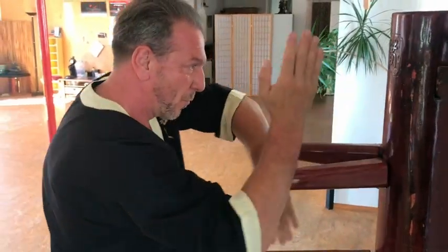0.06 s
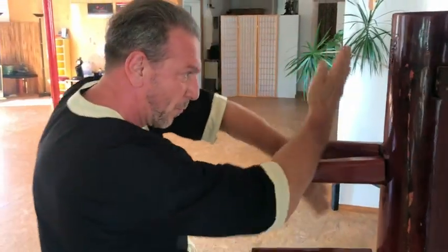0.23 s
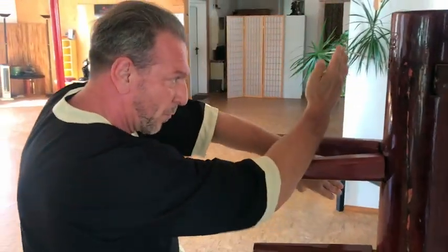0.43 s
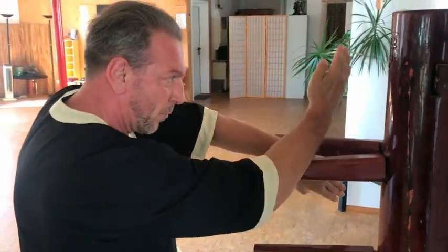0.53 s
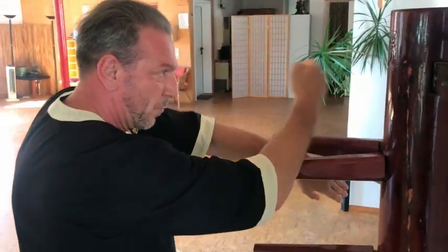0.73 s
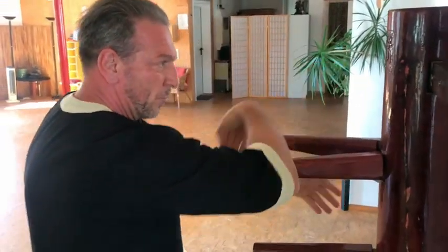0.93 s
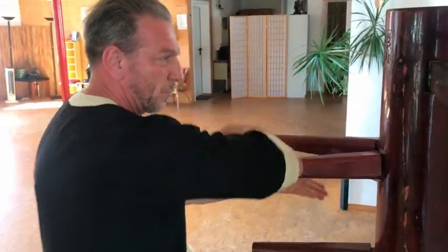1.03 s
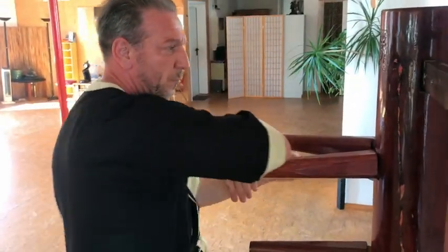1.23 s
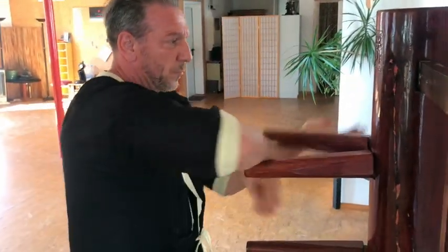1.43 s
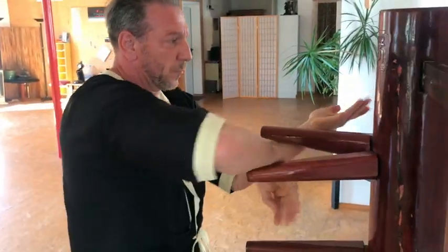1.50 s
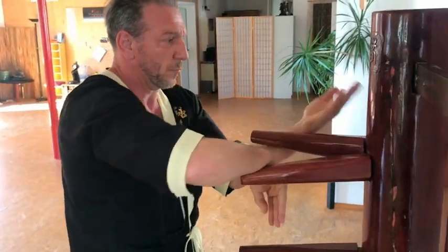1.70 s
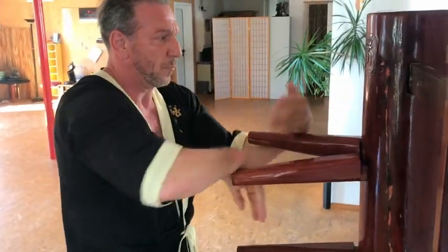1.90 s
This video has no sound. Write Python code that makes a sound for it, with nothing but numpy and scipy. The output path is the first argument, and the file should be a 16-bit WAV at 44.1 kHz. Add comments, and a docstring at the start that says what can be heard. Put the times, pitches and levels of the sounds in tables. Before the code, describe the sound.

Arms knock twice against a wooden training dummy, its loose pegs clattering in an echoing hall.

```python
"""Two forearm strikes on a wooden training dummy, heard from close by in a large hall.
A low rumble and a faint hiss come first. Near 0.25 s a sleeve brushes a loose peg and the arm thuds
on it; the peg slams into its slot and rattles, exciting the modes of the trunk, while the frame shudders
and the hiss fades. At 1.5 s the second strike lands, with sleeves snapping taut and rubbing.
A few weaker knocks follow as the hall reverberates."""
import sys
import numpy as np
from scipy import signal
from scipy.fft import rfft, irfft
from scipy.io import wavfile
from scipy.ndimage import uniform_filter1d

SR = 44100
rng = np.random.default_rng(int(sys.argv[2]) if len(sys.argv) > 2 else 0)


def unload_audio(sound):
    """Save the sound as a 16-bit wav file, at the path given as the first command line argument."""
    columns = np.transpose(np.atleast_2d(sound))
    # keep every value between -1 and 1, then stretch to whole-number steps
    steps = np.round(np.clip(columns, -1, 1) * 32767)
    wavfile.write(sys.argv[1], SR, steps.astype(np.int16))


N = 85995
SCENE_T, EVENT_T = np.arange(N) / SR, np.arange(SR // 2) / SR
NEAR_CORRELATION = 0.56  # between the channels, for nearby noise sources


def amp(db):
    """Amplitude ratio of a level in decibels."""
    return 10 ** (np.asarray(db) / 20)

def unit(x):
    """Normalisation to rms 1."""
    return x / np.sqrt(np.mean(x ** 2) + 1e-20)

def read(points, hz):
    """Interpolation on a logarithmic frequency axis."""
    f, value = np.transpose(points)
    return np.interp(np.log(hz + 1), np.log(f), value)

def add(mix, start_s, sound):
    """Superposition: a sound joins both channels at start_s."""
    part = mix[:, max(round(start_s * SR), 0):][:, :sound.shape[-1]]
    part += sound[..., :part.shape[1]]

def decay(t, t60):
    """Exponential damping: 60 dB down after t60 seconds."""
    return np.exp(-np.log(1000) * t / t60)

def lowpass(x, corner_hz):
    """Second-order low-pass: a softer contact excites less treble."""
    return signal.lfilter(*signal.butter(2, corner_hz, fs=SR), x)

def pair(a, b, correlation):
    """Partial coherence: two independent signals mix into two correlated channels."""
    return np.array([a, correlation * a + np.sqrt(1 - correlation ** 2) * b])

def noise(spectrum):
    """Spectral shaping of white noise, at rms 1."""
    gain = amp(read(spectrum, np.fft.rfftfreq(N, 1 / SR)))
    return unit(irfft(rfft(rng.standard_normal(N)) * gain, N))

def colour(x, spectrum, size=2048):
    """Minimum-phase filtering: the spectrum is shaped and nothing precedes the onset."""
    log_gain = np.log(amp(read(spectrum, abs(np.fft.fftfreq(size, 1 / SR)))))
    taps = np.fft.ifft(np.exp(np.conj(signal.hilbert(log_gain)))).real
    return signal.fftconvolve(x, taps)[:len(x)]

def burst(spectrum, t60):
    """Modal overlap: countless short-lived modes merge into decaying noise."""
    envelope = decay(EVENT_T, t60)
    a, b = (unit(colour(rng.choice([-1., 1.], len(EVENT_T)) * envelope, spectrum)) for _ in range(2))
    return pair(a, b, NEAR_CORRELATION) * np.sqrt(np.mean(envelope ** 2))

def ring(modes, stretch=1, longest_t60_s=0.26):
    """Free vibration: wood rings briefly as a sum of damped modes, decay times capped."""
    waves = 0
    for k, (hz, db, t60) in enumerate(modes):
        envelope = amp(db) * decay(EVENT_T, min(t60, longest_t60_s))
        waves += (-1) ** k * envelope * np.sin(2 * np.pi * hz * stretch * EVENT_T)
    return waves / np.sqrt(sum(amp(db) ** 2 for _, db, _ in modes))


# Spectrum of the hall's rumble: frequency_hz, relative_db
RUMBLE_SPECTRUM = [(20, -6.5), (45, -2.5), (90, -9), (180, -17.5), (500, -22), (1500, -24.5), (4500, -34.5),
                   (9000, -38), (16000, -46.5)]

def rumble(level_db=-59.5):
    """Ambient noise of the hall: mostly bass, and nearly incoherent between the channels."""
    return amp(level_db) * pair(noise(RUMBLE_SPECTRUM), noise(RUMBLE_SPECTRUM), correlation=0.15)

def hiss(half_width_hz=200, end_s=0.58, fade_s=0.05):
    """Narrow-band noise: modulation shifts low-passed noise up to two faint bands, which fade out."""
    bands = np.zeros((2, N))
    for centre_hz, db in (3252, -70), (4400, -68.5):
        flutter = unit(lowpass(rng.standard_normal((2, N)), half_width_hz))
        bands += amp(db) * flutter * np.sin(2 * np.pi * centre_hz * SCENE_T)
    return bands * np.clip((end_s - SCENE_T) / fade_s, 0, 1)


# Shudders of the floor and stand: start_s, level_db, pitch_hz, t60_s
FRAME_SHUDDERS = [(0.06, -45, 44.4, 0.51), (0.248, -36, 275, .13), (.295, -35.5, 160.6, 0.19),
                  (0.314, -47, 103.7, .6), (0.319, -45.5, 73, 0.64), (1.538, -38.5, 220.5, 0.15),
                  (1.547, -52, 80.7, 0.89), (1.743, -47, 233, 0.058), (1.899, -48.5, 137, 0.43)]

def frame_shudder(rise_s=0.00612):
    """Damped resonance: low modes of the floor and stand swell quickly and die away."""
    out = np.zeros((2, N))
    for start_s, db, hz, t60 in FRAME_SHUDDERS:
        envelope = (1 - np.exp(-EVENT_T / rise_s)) * decay(EVENT_T, t60)
        add(out, start_s, amp(db) * envelope * np.sin(2 * np.pi * hz * EVENT_T))
    return out


# Modes of a peg: pitch_hz, relative_db, t60_s
PEG_MODES = [(373, -16, 0.031), (517, -14, .06), (637, -11.5, 0.065), (778.8, -6, 0.15),
             (819.6, -1.5, 0.049), (1511, -11, 0.027), (1631.4, -7.5, 0.12), (2440, -8.5, 0.021),
             (2620, -9, .05)]
# Spectrum of clattering wood: frequency_hz, relative_db
CLATTER_SPECTRUM = [(50, -50), (130, -26.5), (230, -10.5), (450, -4.5), (800, 1.5), (1400, -4.5),
                    (2300, -8.5), (3600, -8.5), (5000, -11.5), (7000, -5), (16000, -42.5)]
# Sleeve or forearm meets peg: start_s, ring_db, noise_db, pitch_hz, corner_hz
SOFT_CONTACTS = [(.1735, -44.5, -45.5, 693, 780), (0.237, -42.5, -30.5, 900, 4200),
                 (.2411, -13.5, -20.5, 783.5, 1093), (.2527, -20, -12, 671.3, 1126),
                 (1.5048, -17.5, -27, 833, 2600), (1.5238, -15, -22.5, 832, 2320)]

def soft_contacts(strongest_mode_hz=820):
    """Cushioned impact: a sleeve brushes the peg, then the forearm thuds on it."""
    blows, rings = np.zeros((2, 2, N))
    for start_s, ring_db, noise_db, pitch_hz, corner_hz in SOFT_CONTACTS:
        peg = ring(PEG_MODES, stretch=pitch_hz / strongest_mode_hz)
        contact = burst(CLATTER_SPECTRUM, t60=0.059)
        add(rings, start_s, amp(ring_db) * lowpass(peg, corner_hz))
        add(blows, start_s, amp(noise_db) * lowpass(contact, corner_hz))
    return blows, rings


# Spectrum of sleeve cloth: frequency_hz, relative_db
CLOTH_SPECTRUM = [(300, -22), (2000, -11.5), (5000, -7.5), (7500, -4.5), (10500, 2), (12500, -1.5),
                  (14800, -12), (16200, -17.5)]
# Envelope of a sleeve sliding over a peg: time_s, level_db
SLEEVE_RUSTLE = [(0, -92), (.231, -73), (0.235, -43), (.25, -53.5), (.3, -69.5), (.5, -96), (1.101, -89),
                 (1.4, -70.5), (1.52, -71.5), (1.62, -49), (1.645, -42), (1.71, -50.5), (1.76, -48.5),
                 (1.787, -49.5), (1.83, -47), (1.87, -50.5), (1.95, -63)]
# Cloth snaps taut: start_s, level_db
SLEEVE_SNAPS = [(1.123, -64.5), (1.262, -59.5), (1.5429, -17), (1.6295, -23.5), (1.633, -23), (1.6475, -35),
                (1.7673, -34), (1.7704, -21), (1.7855, -31)]

def sleeves(grain_db=2.5):
    """Friction noise: sliding cloth rustles unevenly, and sudden tension makes it snap."""
    grain = unit(uniform_filter1d(rng.standard_normal(N), size=120))
    level_db = np.interp(SCENE_T, *np.transpose(SLEEVE_RUSTLE)) + grain_db * grain
    out = amp(level_db) * pair(noise(CLOTH_SPECTRUM), noise(CLOTH_SPECTRUM), NEAR_CORRELATION)
    for start_s, db in SLEEVE_SNAPS:
        add(out, start_s, amp(db) * burst(CLOTH_SPECTRUM, t60=0.0086))
    return out


# Modes of the trunk: pitch_hz, relative_db, uncapped_t60_s
TRUNK_MODES = [(272.9, -11.5, 0.29), (421, -9, 1), (591, -7, .35), (680, 3.5, 0.75), (847, 1, 0.22),
               (948, -1.5, .25), (1019.5, -9, 0.14), (1168, -11, .3), (1301, 0.5, 0.41), (1510, 2.5, 0.1),
               (1660, -3, .3), (1860, 0.5, 0.56), (2006, 0.5, 0.9)]
# Modes of the small wedges that hold the pegs: pitch_hz, relative_db, t60_s
WEDGE_MODES = [(2950, -10, .02), (3460, 0, .022), (3950, -6, .02), (4400, -3, 0.0201), (4940, -2.5, 0.021),
               (5370, -4, .018)]
# Spectrum of a sharp wooden crack: frequency_hz, relative_db
CRACK_SPECTRUM = [(300, -19.5), (2000, -10), (4500, 0), (6500, -9.5), (8500, 3.5), (11000, 1),
                  (13000, -2.5), (16000, -24.5)]
# Peg hits slot: start_s, trunk_db, peg_db, clatter_db, wedge_db, crack_db, corner_hz
PEG_KNOCKS = [(.255, -15.5, -16, -10, -32, -24, 3420), (.2618, -24.5, -21, -18, -26, -28, 3500),
              (.2655, -35, -57, -50, -53, -44, 3060), (.2798, -42, -21, -20, -42, -39, 2700),
              (.289, -61, -50, -23, -31, -42, 4060), (.2965, -39, -37, -22.5, -24, -51.5, 4040),
              (.3075, -38, -36, -24.5, -21, -33, 5970), (.3213, -46, -25, -22, -34, -33, 2670),
              (.332, -35, -49, -18, -33, -33.5, 4100), (.3435, -41, -39, -27, -35, -32, 4020),
              (1.5319, -40, -33, -29.5, -27, -37.5, 3000), (1.5417, -30.5, -39, -14, -26, -21, 3200),
              (1.5526, -48, -13.5, -12, -28.5, -27, 2780), (1.5663, -63, -41, -22, -22, -52, 3900),
              (1.577, -38, -22.5, -22.5, -38, -46, 2380), (1.744, -32.5, -36, -25, -65, -65, 905),
              (1.817, -59, -59, -32.5, -71, -60, 1170), (1.862, -50, -34.5, -52, -56, -56, 1460),
              (1.905, -58.5, -67, -37, -40.5, -47.5, 3120)]

def peg_knocks():
    """Hard impact: wood on wood clatters and cracks, exciting the modes of trunk, peg and wedges."""
    blows, rings = np.zeros((2, 2, N))
    trunk, peg, wedge = ring(TRUNK_MODES), ring(PEG_MODES), ring(WEDGE_MODES)
    for start_s, trunk_db, peg_db, clatter_db, wedge_db, crack_db, corner_hz in PEG_KNOCKS:
        body = lowpass(amp(trunk_db) * trunk + amp(peg_db) * peg, corner_hz)
        clatter = lowpass(burst(CLATTER_SPECTRUM, t60=0.055), corner_hz)
        crack = burst(CRACK_SPECTRUM, t60=0.039)
        add(rings, start_s, body + amp(wedge_db) * wedge)
        add(blows, start_s, amp(clatter_db) * clatter + amp(crack_db) * crack)
    return blows, rings


# Reverberation time of the hall: frequency_hz, t60_s
HALL_DECAY = [(80, 1.34), (250, 0.84), (700, 1.0349), (1500, 1.3943), (3000, 1.3), (5500, 0.87),
              (9000, 0.68), (15000, 0.87)]
# Spectrum of the diffuse tail: frequency_hz, level_db
TAIL_SPECTRUM = [(60, 6.5), (250, 1.5), (700, -6), (1500, -4), (3000, -4), (6000, -6), (10000, -8.5),
                 (16000, -18)]

def hall(source, build_s=0.019, early_db=-9, early_t60_s=0.061):
    """Reverberation: scattered early reflections, then a diffuse tail that decays band by band."""
    t = np.arange(3 * SR // 2) / SR
    hz, when, bands = signal.stft(rng.standard_normal((2, len(t))), SR, nperseg=512)
    t60 = read(HALL_DECAY, hz)[:, None]
    unit_energy_decay = decay(when, t60) * np.sqrt(2 * np.log(1000) / (t60 * SR))
    bands *= unit_energy_decay * amp(read(TAIL_SPECTRUM, hz))[:, None]
    build_up = 1 - np.exp(-(t / build_s) ** 2)
    tail = signal.istft(bands, SR, nperseg=512)[1][:, :len(t)] * build_up
    taps = rng.standard_normal((2, len(t))) * (rng.random((2, len(t))) < .03)  # sparse arrivals
    taps *= decay(t, early_t60_s) * (t > .003)
    early = amp(early_db) * taps / np.linalg.norm(taps, axis=1, keepdims=True)
    response = pair(*(tail + early), correlation=0.4)
    return signal.fftconvolve(source[None], response, axes=1)[:, :N]

def scene(resonance_send_db=-3, lowest_ring_hz=170, turn_hz=17):
    """Superposition of direct sound, reverberation and ambient noise."""
    blows, rings = np.add(soft_contacts(), peg_knocks())
    rings = signal.lfilter(*signal.butter(2, lowest_ring_hz, "high", fs=SR), rings)
    noises = blows + sleeves()
    resonances = rings + frame_shudder()
    sent = (noises + amp(resonance_send_db) * resonances)[0]
    # Turning between two hall responses gives successive knocks different paths through the room.
    turn = 2 * np.pi * turn_hz * SCENE_T
    reverberation = hall(sent * np.cos(turn)) + hall(sent * np.sin(turn))
    return noises + resonances + reverberation + hiss() + rumble()


# Level difference between the microphones: frequency_hz, left_minus_right_db
LEVEL_DIFFERENCE = [(30, -10), (120, -3.5), (250, 1), (500, -2), (1000, -3.5), (2000, -1.8), (4000, 0),
                    (12000, -0.5)]
# Phase difference between the microphones: frequency_hz, left_lead_rad
PHASE_DIFFERENCE = [(100, .05), (500, 0.25), (1000, 0.75), (2000, 1), (4000, .5), (8000, 0.36),
                    (14000, 0.72)]

def record(dry, ceiling=0.538, band_limit_hz=16400):
    """Stereo level and phase differences, then soft saturation of the peaks and a band limit."""
    hz = np.fft.rfftfreq(2 * N, 1 / SR)
    left = amp(read(LEVEL_DIFFERENCE, hz) / 2) * np.exp(.5j * read(PHASE_DIFFERENCE, hz))
    heard = irfft(rfft(dry, 2 * N) * [left, 1 / left])[:, :N]
    rounded = heard / (1 + (heard / ceiling) ** 4) ** .25
    taps = signal.firwin(511, band_limit_hz, window=("kaiser", 9), fs=SR)
    return signal.oaconvolve(rounded, taps[None], "same")


dry = scene()
out = record(dry)
unload_audio(out)
```